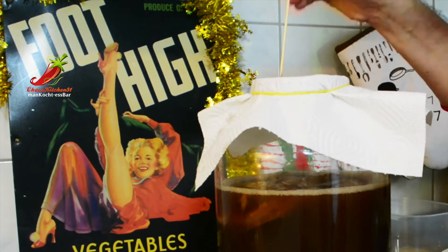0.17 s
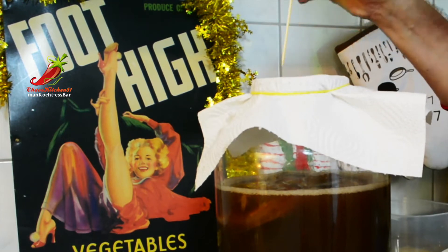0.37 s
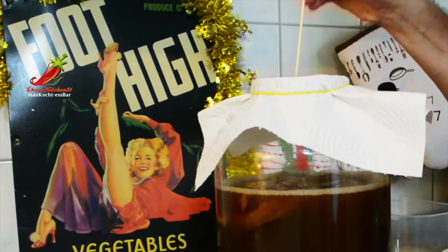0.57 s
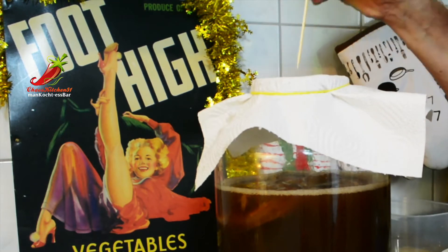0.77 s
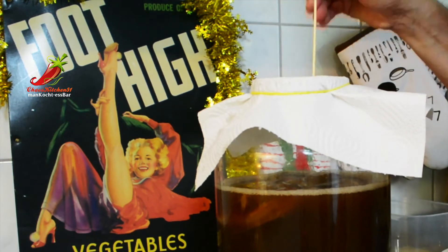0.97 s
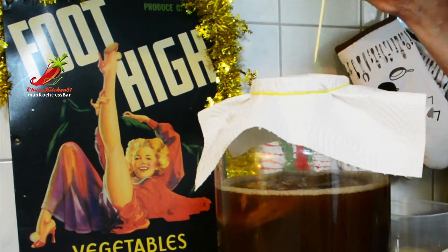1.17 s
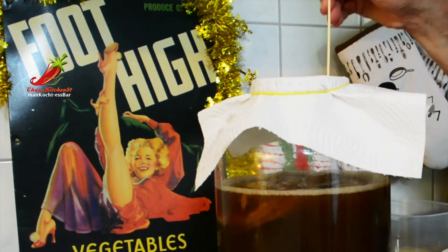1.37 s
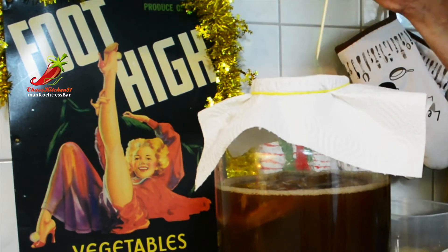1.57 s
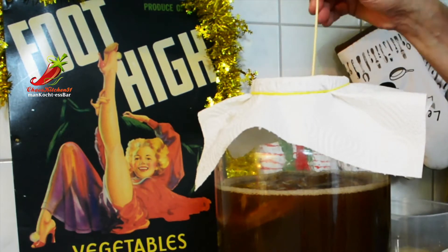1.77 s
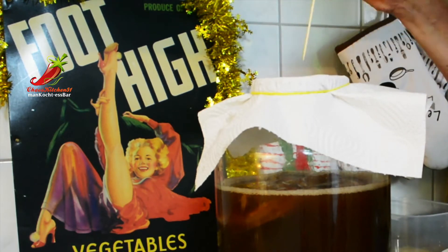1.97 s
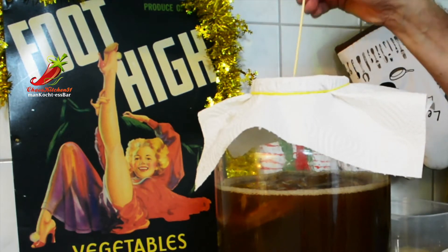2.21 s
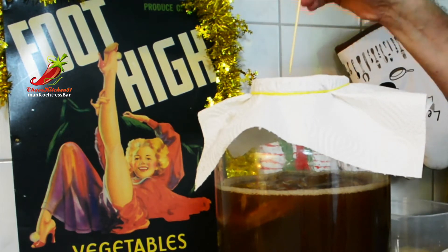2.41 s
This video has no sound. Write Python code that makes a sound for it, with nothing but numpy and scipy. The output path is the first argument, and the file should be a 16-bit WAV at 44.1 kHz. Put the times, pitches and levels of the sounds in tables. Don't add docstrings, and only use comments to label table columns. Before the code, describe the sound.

Five short, hollow pops of taut paper being pierced over a jar, evenly spaced, the first loudest and fourth softest, then a faint dull drag of the stick; close pickup, short bright kitchen reverberation, quiet hiss.

```python
import sys
import numpy as np
from scipy import signal
from scipy.fft import rfft, irfft, next_fast_len
from scipy.io import wavfile

SR = 44100
rng = np.random.default_rng(int(sys.argv[2]) if len(sys.argv) > 2 else 0)


def magnitude_from_level(level_db):
    exponent = np.asarray(level_db, float) / 20
    return 10 ** exponent


def materialize(psi):
    bounded = np.clip(np.atleast_2d(psi).T, -1, 1)
    quanta = np.round(bounded * 32767).astype(np.int16)
    wavfile.write(sys.argv[1], SR, quanta)


N = 108045
DRUM_HZ = 362


def unit(x):
    return x / np.sqrt(np.mean(x ** 2) + 1e-20)


def along(points, hz):
    point_hz, values = np.transpose(points)
    return np.interp(np.log(hz + 1), np.log(point_hz + 1), values)


def filtered(x, response):
    size = next_fast_len(x.shape[-1] + SR // 2)
    spectrum = rfft(x, size) * response(np.fft.rfftfreq(size, 1 / SR))
    return irfft(spectrum, size)[..., :x.shape[-1]]


def stereo_noise(size, spectrum, likeness):
    def colour(hz):
        angle = np.arccos(np.clip(along(likeness, hz), -1, 1)) / 2
        return magnitude_from_level(along(spectrum, hz)) * [np.cos(angle), np.sin(angle)]

    mid, side = filtered(rng.standard_normal((2, size)), colour)
    return np.array([mid + side, mid - side])


def hiss(spectrum, size):
    lowest_hz = spectrum[0][0]
    noise = rng.standard_normal(size)
    return unit(filtered(noise, lambda hz: magnitude_from_level(along(spectrum, hz)) * (hz > lowest_hz)))


def add(track, start_s, sound):
    start = round(start_s * SR)
    track[start:][:len(sound)] += sound[:len(track) - start]


# frequency_hz, density_db [dB per Hz]
FLOOR_COLOUR = [(25, -27), (60, -17.5), (130, -10.5), (400, -4.5), (700, -2.5), (2000, -8.5), (7000, -21),
                (16000, -35)]
# frequency_hz, likeness [0-1]
FLOOR_LIKENESS = [(60, 0.957), (240, 0.712), (950, 0.3002), (3770, 0.1627), (15000, 0.0689)]


def background():
    t = np.arange(N) / SR
    air = magnitude_from_level(-55) * unit(stereo_noise(N, FLOOR_COLOUR, FLOOR_LIKENESS))
    hum = magnitude_from_level(-75) * np.sqrt(2) * np.sin(2 * np.pi * 100 * t)
    squeak_s, squeak_hz, half_length_s = 1.3849, 3429, 0.002
    phase = 2 * np.pi * squeak_hz * t
    envelope = magnitude_from_level(-66) * np.exp(-((t - squeak_s) / half_length_s) ** 4)
    return air + hum + envelope * (np.sin(phase) + .7 * np.sin(2 * phase))


# delay_s, reflection_factor [signed ratio]
WALL_ECHOES = [(.01, .1), (.0144, .15), (.0221, -.35), (.0313, -.5), (.0347, .09), (.0387, .33),
               (.0463, -.17), (.0522, -.2), (.0612, -.15), (.081, -.1)]


def wall_echoes(size):
    echoes = np.zeros(size)
    for delay_s, factor in WALL_ECHOES:
        echoes[round(delay_s * SR)] = factor
    return filtered(echoes, lambda hz: 1 / (1 + (hz / 560) ** 8))


# frequency_hz, level_db, t60_s
STANDING_WAVES = [(336.86, -22, 0.46885), (546.05, -29, 0.5567), (624.62, -13.5, 0.311), (702, -29, 0.3385),
                  (838.15, -18, 0.266), (997.26, -8.5, 0.1), (1058.5, -36.5, 0.3038), (1090, -16, 0.21),
                  (1360.1, -24.5, 0.3346), (1972.3, -30, 0.4609)]


def standing_waves(t):
    modes = 0
    for hz, level_db, t60_s in STANDING_WAVES:
        modes = modes + magnitude_from_level(level_db - 60 * t / t60_s) * np.sin(2 * np.pi * hz * t)
    return modes * (1 - np.exp(-(t / 0.03) ** 2))


TAIL_RISE_S = 0.005193
# frequency_hz, t60_s
TAIL_T60 = [(150, 0.4113), (400, 0.192), (1000, 0.30159), (3000, 0.25735), (9000, 0.25727),
            (15000, 0.14305)]
# frequency_hz, level_db [over the direct sound]
TAIL_LEVEL = [(120, 9.5), (190, 11), (350, 3), (500, 9.5), (900, 11), (2000, 5), (5000, 7.5), (12000, 10.5)]
# frequency_hz, likeness [0-1]
TAIL_LIKENESS = [(100, 0.9866), (400, 1), (1500, 0.99722), (4000, 0.92583), (10000, 0.8125),
                 (15000, 0.2043)]
# frequency_hz, rise_s
TAIL_BUILD_UP = [(400, 0.07216), (650, 0.0013), (3000, TAIL_RISE_S)]


def diffuse_tail(t):
    noise = stereo_noise(len(t), TAIL_LEVEL, TAIL_LIKENESS)
    hz, frame_s, z = signal.stft(noise, SR, nperseg=256)
    decay = magnitude_from_level(-60 * frame_s / along(TAIL_T60, hz)[:, None])
    growth = 1 - np.exp(-(frame_s / along(TAIL_BUILD_UP, hz)[:, None]) ** 2)
    tail = signal.istft(z * decay * growth, SR, nperseg=256)[1][:, :len(t)]
    return tail * (t > 0.0018) / np.sqrt(SR / 20)


def kitchen(near, blows):
    size = SR * 6 // 10
    t = np.arange(size) / SR
    response = diffuse_tail(t) + wall_echoes(size)
    reflected = signal.fftconvolve(near[None], response, axes=1)[:, :N]
    return reflected + signal.fftconvolve(blows, standing_waves(t))[:N]


# start_s, level_db, t60_s
FIBRE_TICKS = [
    (.541, -59.5, .02),
    (.952, -74, 0.0223),
    (1.363, -56.5, 0.01057),
    (2.177, -51, 0.02037),
    (2.268, -48.5, 0.02536),
    (2.428, -64.5, 0.0908),
]
# frequency_hz, density_db [dB per Hz]
FIBRE_COLOUR = [(1500, -4.5), (4000, -19), (7500, -13), (11000, -18), (14000, -28), (16000, -30.5)]


def fibre_ticks():
    out, t = np.zeros(N), np.arange(SR // 10) / SR
    for start_s, level_db, t60_s in FIBRE_TICKS:
        add(out, start_s, magnitude_from_level(level_db - 60 * t / t60_s) * hiss(FIBRE_COLOUR, len(t)))
    return out


# release_s, level_db, rise_s, scratch_db [over the drum]
SOFT_CONTACTS = [(0.241, -33.5, .012, -24.5), (0.641, -27.5, .012, -25.5), (1, -44.5, .012, -20.5),
                 (1.381, -34, .012, -17), (1.788, -32, .012, -23.5), (2.165, -39, .014, -14),
                 (2.174, -33, 0.0055, -18), (2.181, -19.5, .006, -31), (2.194, -21.5, 0.0054, -46.5),
                 (2.202, -20.5, 0.0038586, -28), (0.987, -50.5, 0.021, -18), (0.336, -27.5, .015, -10),
                 (.375, -40.5, .02, -2.5), (0.744, -38, .02, -3), (0.788, -51.5, .02, 3.5),
                 (1.115, -30, .008, -6.5), (1.149, -31, 0.010045, -15.5), (1.501, -50.5, .02, 5.5),
                 (1.9, -34, .02, -6), (2.269, -42.5, .002, -1.5), (1.391, -37, 0.0069, -32.5)]
# frequency_hz, density_db [dB per Hz]
SCRATCH_COLOUR = [(500, -0.5), (700, 6), (1100, -3), (2200, -1), (6000, -19), (10500, -23), (12500, -32),
                  (15000, -52)]


def touches():
    out, t = np.zeros(N), np.arange(SR // 10) / SR
    fade_s, drag_s = 0.0024558, 0.007986
    overtone = magnitude_from_level(-18) * np.sin(2 * np.pi * 647.75 * t)
    for release_s, level_db, rise_s, scratch_db in SOFT_CONTACTS:
        rise_s = np.clip(rise_s, .001, .05)
        swell = np.sin(np.pi / 2 * np.minimum(t / rise_s, 1)) ** 2
        after = np.maximum(t - rise_s, 0)
        tone = np.sin(2 * np.pi * 1.0277 * DRUM_HZ * (t - rise_s)) + overtone
        drum = np.exp(-(after / fade_s) ** 2) * tone
        scratch = magnitude_from_level(scratch_db) * np.exp(-after / drag_s) * hiss(SCRATCH_COLOUR, len(t))
        add(out, release_s - rise_s, magnitude_from_level(level_db) * swell * (drum + scratch))
    return out


def thump(t):
    sag_turns, sag_s, t60_s, hold_s, choke_s = .46, .0006, .1, .0066, .0012
    turns = -.6 + DRUM_HZ * t + sag_turns * (1 - np.exp(-t / sag_s))
    attack = 1 - np.exp(-t / .0002)
    choke = np.exp(-np.maximum(t - hold_s, 0) / choke_s)
    return np.cos(2 * np.pi * turns) * attack * magnitude_from_level(-60 * t / t60_s) * choke


# frequency_hz, level_db, t60_s
SHEET_MODES = [(717.2, -50, 0.016), (980.1, -22, 0.01597), (1179.3, -11, 0.012824), (1483.5, -7, 0.009483),
               (1725.6, -5.5, 0.005888), (2004.7, -5.5, 0.010535), (2507.8, -11.5, 0.02203),
               (2892.1, -14, 0.02295), (3826.2, -19.5, 0.01688)]


def snap(t, tilt_db):
    ring = 0
    for hz, level_db, t60_s in SHEET_MODES:
        mode_db = level_db + tilt_db * np.log2(hz / 1500) + rng.normal(0, 1)
        ring = ring - magnitude_from_level(mode_db - 60 * t / t60_s) * np.sin(2 * np.pi * hz * t)
    return ring * (1 - np.exp(-t / 0.0005775))


# frequency_hz, density_db [dB per Hz]
TEAR_COLOUR = [(1470, -6.5), (2500, 0.5), (7190, -14.5), (8140, -11), (9580, -17.5), (10700, -14),
               (16000, -34.5)]


def tearing(t, level_db, tilt_db):
    colour = [(hz, density_db + tilt_db * np.log2(hz / 6000)) for hz, density_db in TEAR_COLOUR]
    fizz = magnitude_from_level(level_db - 27 - 60 * t / 0.065804) * hiss(colour, len(t))
    return fizz * (1 - np.exp(-(t / 0.0005681) ** 2))


def crack(impulses):
    return filtered(impulses, lambda hz: magnitude_from_level(along(TEAR_COLOUR, hz)) * (hz / (hz + 2500)) ** 2)


POKE_TIMES = [.2490, .6485, 1.0100, 1.3986, 1.7919]
# thump_db, snap_db and fizz_db [over the thump], snap_tilt and fizz_tilt [dB/octave]
POKE_LEVELS = [
    (-3.5, -2, 6, -15, -1.5),
    (-5, -4.5, -0.5, 4, 2),
    (-5.5, -2.5, 2, 5.0264, -0.494),
    (-8, -6.5, 4, 3.4628, 3),
    (-6.5, -5.5, 12.5, -1.0012, -2.5),
]


def pokes():
    out, blows, cracks = np.zeros((3, N))
    t = np.arange(SR // 10) / SR
    for start_s, levels in zip(POKE_TIMES, POKE_LEVELS):
        thump_db, snap_db, fizz_db, snap_tilt_db, fizz_tilt_db = levels
        add(out, start_s, magnitude_from_level(thump_db) * (thump(t) + magnitude_from_level(snap_db) * snap(t, snap_tilt_db)))
        tear = magnitude_from_level(thump_db) * tearing(t, fizz_db, fizz_tilt_db)
        add(out, start_s - .0008, tear)
        blows[round(start_s * SR)] = magnitude_from_level(thump_db + snap_db)
        cracks[round(start_s * SR)] = -magnitude_from_level(thump_db + fizz_db - 23.5)
    return out + crack(cracks), blows


def microphone(x):
    heard = filtered(x, lambda hz: 1 / np.sqrt(1 + (165 / (hz + 1)) ** 7))
    return heard * magnitude_from_level([[.1], [-.1]])


def scene():
    pops, blows = pokes()
    near = pops + touches() + fibre_ticks()
    return microphone(near + kitchen(near, blows)) + background()


def low_pass(x):
    return signal.sosfilt(signal.butter(12, 16460, fs=SR, output="sos"), x)


def record(dry):
    mix = filtered(dry, lambda hz: hz < 15900)
    return low_pass(mix)


dry = scene()
out = record(dry)
materialize(out)
```